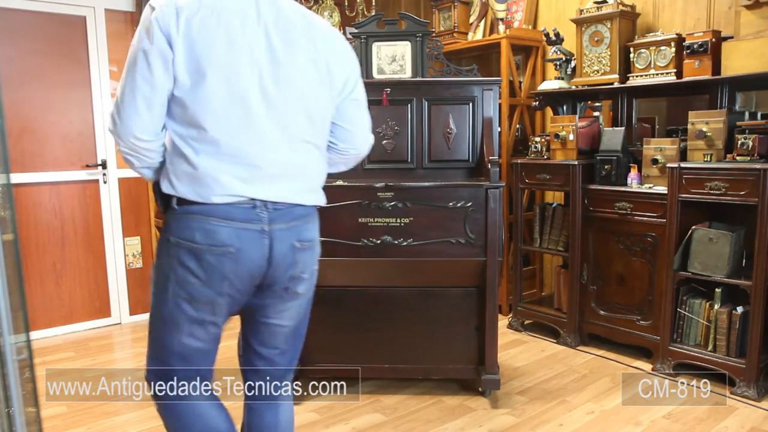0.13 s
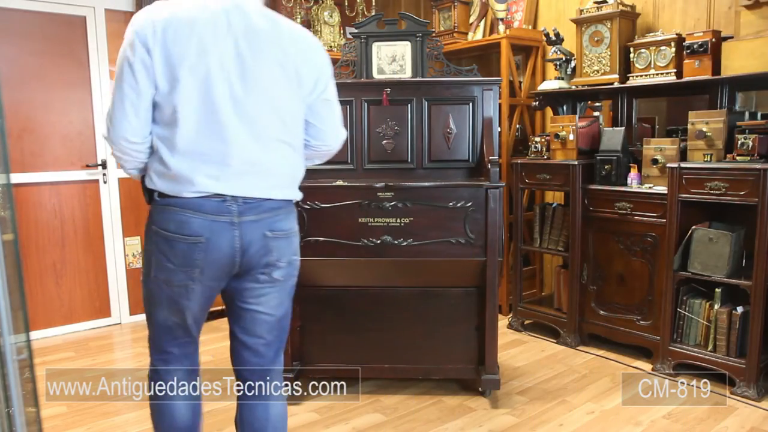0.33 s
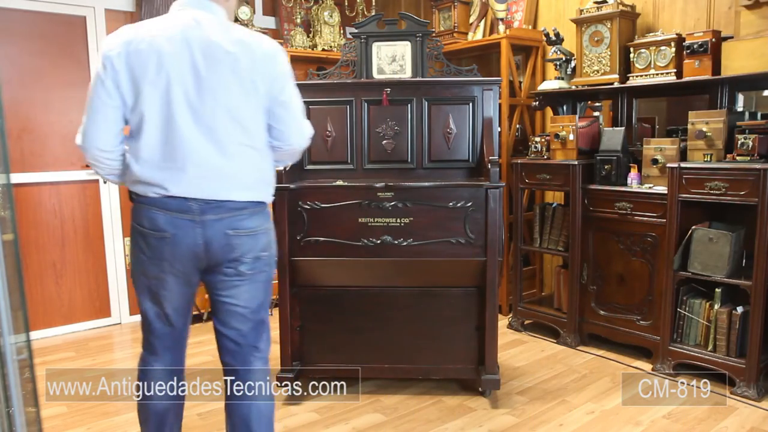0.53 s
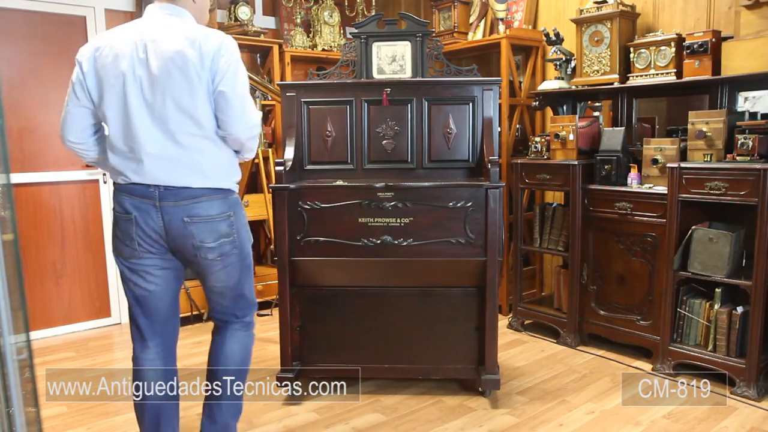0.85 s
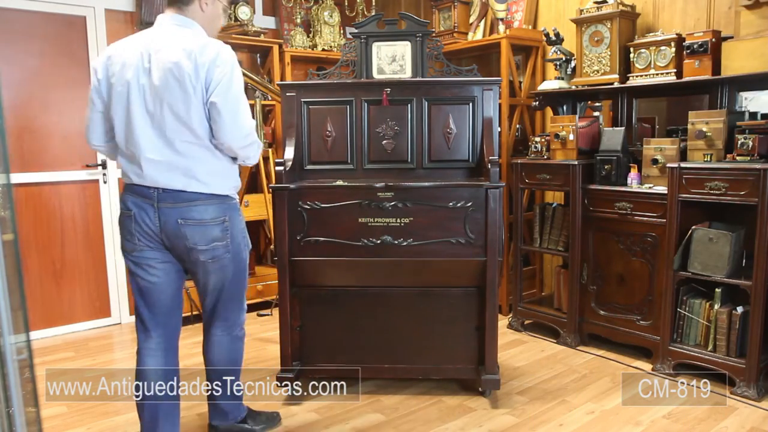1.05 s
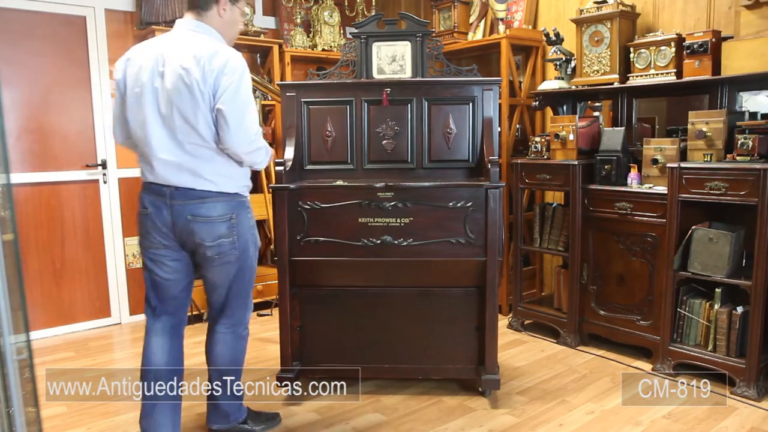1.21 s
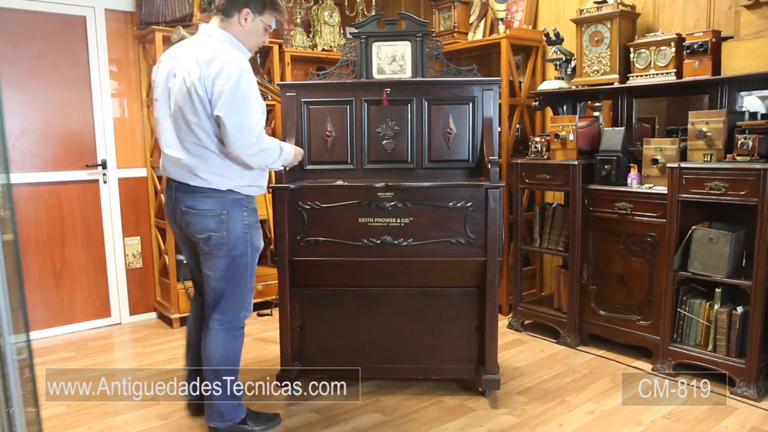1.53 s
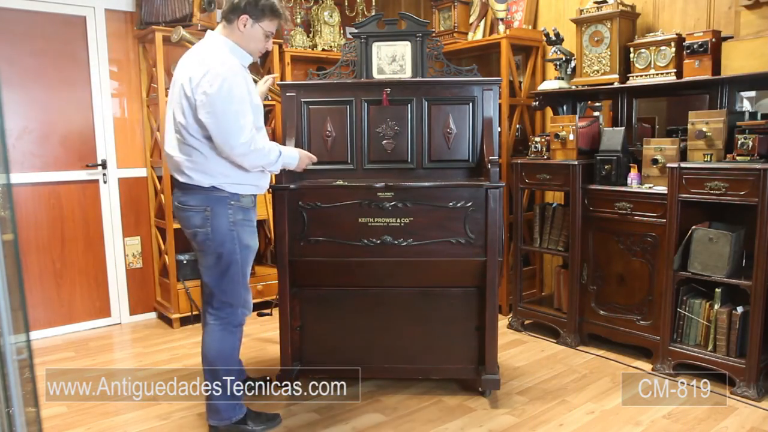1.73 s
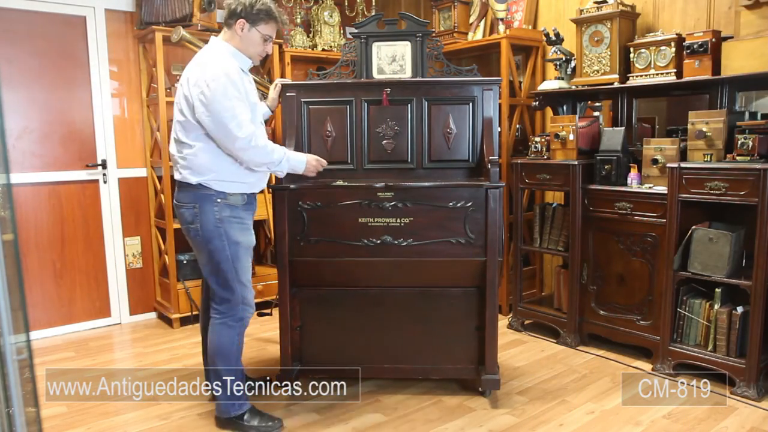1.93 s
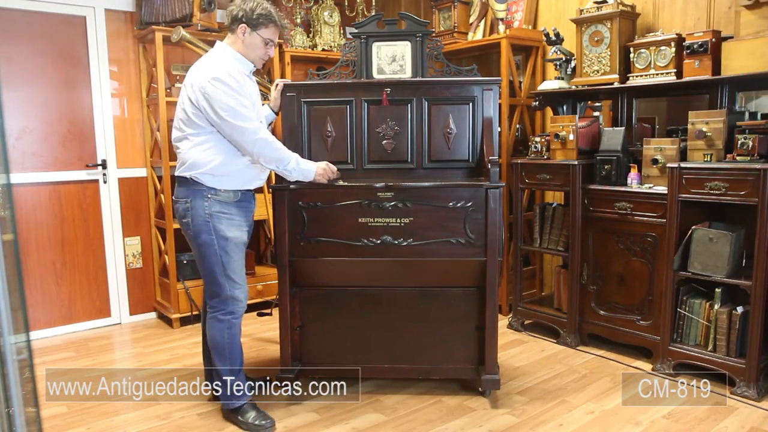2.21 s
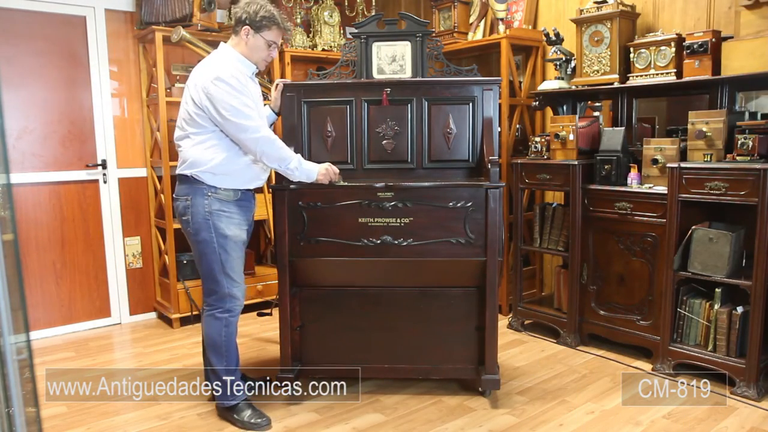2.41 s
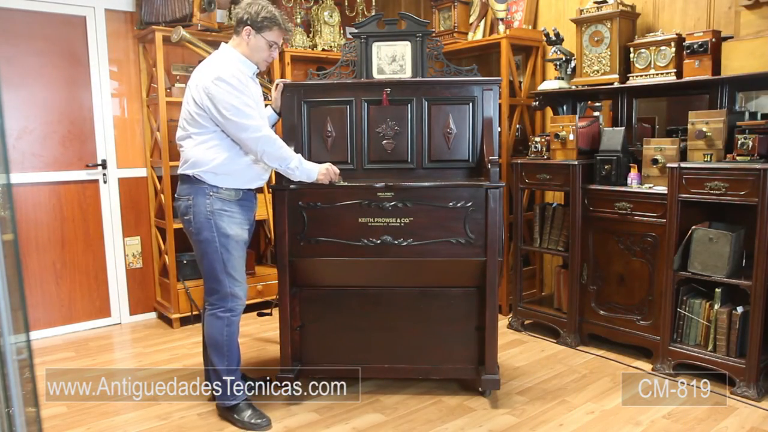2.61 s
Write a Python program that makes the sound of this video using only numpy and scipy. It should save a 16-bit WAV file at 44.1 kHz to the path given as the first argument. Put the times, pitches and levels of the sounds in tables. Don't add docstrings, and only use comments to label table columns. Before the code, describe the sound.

Footsteps in hard-soled shoes scuff and squeak across a wooden floor, then a hand knocks a rattling cabinet lid

```python
import sys
import numpy as np
from scipy import signal
from scipy.fft import rfft, irfft, next_fast_len
from scipy.io import wavfile
from scipy.ndimage import uniform_filter1d, map_coordinates

SR = 44100
rng = np.random.default_rng(int(sys.argv[2]) if len(sys.argv) > 2 else 0)


def magnitude_from_level(level_db):
    exponent = np.asarray(level_db, float) / 20
    return 10 ** exponent


def digitize_waveform(pressure):
    field = np.atleast_2d(pressure).T
    bounded = np.clip(field, -1, 1)
    quanta = np.round(bounded * 32767).astype(np.int16)
    wavfile.write(sys.argv[1], SR, quanta)


N = 121275


def unit(x):
    return x / np.sqrt(np.mean(x ** 2) + 1e-20)


def along(points, hz):
    f, v = np.transpose(points)
    return np.interp(np.log(hz + 1), np.log(f + 1), v)


def wobble(rate_hz):
    knots = rng.standard_normal(int(N * rate_hz / SR) + 4)
    return map_coordinates(knots, [np.arange(N) * rate_hz / SR])


def filtered(x, response):
    m = next_fast_len(N + 8192)
    return irfft(rfft(x, m) * response(np.fft.rfftfreq(m, 1 / SR)), m)[..., :N]


def noise(response):
    return unit(filtered(rng.standard_normal(N), response))


def evened(x, window):
    return unit(x / (abs(uniform_filter1d(x ** 2, size=window)) + .1) ** .35)


def peaks(table):
    def response(f):
        return sum((-1) ** k * magnitude_from_level(db) * 1j * f * w / (c * c - f * f + 1j * f * w)
                   for k, (c, w, db) in enumerate(table))
    return response


def add(track, start_s, sound):
    part = track[max(round(start_s * SR), 0):][:len(sound)]
    part += sound[:len(part)]


def ring(modes, attack_s, spread_db):
    t = np.arange(SR // 2) / SR
    out = np.zeros(len(t))
    for hz, db, t60 in modes:
        out += magnitude_from_level(db + spread_db * rng.normal() - 60 * t / t60) * np.sin(2 * np.pi * hz * t)
    return (1 - np.exp(-t / attack_s)) * out


def pings(table, rise_s):
    out, t = np.zeros(N), np.arange(SR // 4) / SR
    for start_s, peak_db, pitch_hz, t60_s in table:
        decay = magnitude_from_level(peak_db - 60 * t / t60_s) * (1 - np.exp(-t / rise_s))
        add(out, start_s, decay * np.sin(2 * np.pi * pitch_hz * t))
    return out


# start_s, peak_db, pitch_hz, t60_s, overtones_db
TAPS = [(0.063, -20, 505, 0.045, -3), (0.2242, -11.5, 614, 0.11, -7), (.252, -10, 640, 0.053, -27),
        (0.3344, -13.5, 478, 0.088, -1), (0.528, -19.5, 354, 0.099, 2), (.676, -22, 468, 0.066, -9),
        (.867, -9, 748, 0.023, -8.5), (.883, -13.5, 730, 0.05, -19), (1.073, -12.5, 816, 0.03, -1),
        (1.4602, -6, 440, 0.034, -7.5), (1.509, -37, 424, 0.056, -10.5), (1.592, -12, 451, 0.03, -16),
        (1.928, -14.5, 494, 0.055, -3), (2.024, -18.5, 718, 0.042, 2)]
# ratio_to_pitch, level_db
BOARD_OVERTONES = [(.4, -2), (.56, -3), (1.28, -6), (1.62, -8), (2.4, -20)]
# start_s, peak_db,
# pitch_hz, t60_s
THUMPS = [(.2246, -17.5, 338, 0.11), (.3352, 2.5, 491, 0.033), (.338, -5, 199, 0.051),
          (.3405, -7.5, 420, 0.026), (.351, -8.5, 526, .04), (.8672, -13, 430, 0.028),
          (1.5958, 6.5, 448, 0.019), (1.609, -7, 423, 0.037), (2.04, -28, 159, 0.52),
          (2.3065, -16, 240, 0.089), (2.311, -16.5, 869, 0.13), (2.349, -18.5, 472, 0.083),
          (2.4485, -20.5, 463, .07)]


def taps():
    out = pings(THUMPS, rise_s=.0023)
    for start_s, peak_db, pitch_hz, t60_s, over_db in TAPS:
        overtones = [(pitch_hz * ratio, db + over_db, t60_s) for ratio, db in BOARD_OVERTONES]
        board = ring([(pitch_hz, 0, t60_s)] + overtones, attack_s=.0016, spread_db=1)
        add(out, start_s, magnitude_from_level(peak_db - 3) * board)
    return out


# start_s, rise_s, hold_s, level_db,
# extra_air_db
SCUFFS = [(-.05, 0.047, 0.022, -33.5, 1), (0.033, 0.098, 0.048, -40, 3), (0.227, .002, .035, -36, -18),
          (0.207, 0.087, 0.049, -18, -4), (0.463, 0.055, 0.22, -40.5, 1),
          (0.334, 0.019, 0.057, -20.5, -6.5), (0.851, 0.044, 0.13, -25, 2.5),
          (1.022, 0.038, 0.057, -37, -28), (1.146, .06, 0.23, -45, -3), (1.465, 0.055, 0.06, -21, 0),
          (1.606, 0.023, 0.037, -19, -4.5), (1.77, 0.075, 0.098, -26.5, 2.5),
          (1.95, 0.04, 0.054, -30.5, -6), (2.088, 0.11, 0.083, -35.5, 7.5)]
# freq_hz, level_db_per_hz
SOLE_COLOUR = [(410, -22), (700, -8), (1430, -10), (1610, -8.5), (1850, -8.5), (3450, -0.5), (3830, -4.5),
               (9630, -20), (15600, -33)]


def scuffs():
    rise_db, fall_db_per_s, air_hz = 20, 180, 7000
    grit_per_s, grit_spread_db, grit_share = 5000, 1.5, 0.26
    t = np.arange(N) / SR
    grains = (rng.random(N) < grit_per_s / SR) * rng.standard_normal(N)
    grains = unit(grains * magnitude_from_level(grit_spread_db * rng.exponential(size=N)))
    grit = np.sqrt(grit_share) * grains + np.sqrt(1 - grit_share) * rng.standard_normal(N)
    rub = unit(filtered(grit, lambda hz: magnitude_from_level(along(SOLE_COLOUR, hz))))
    air = filtered(rub, lambda hz: 1 / (1 + (air_hz / (hz + 1)) ** 4))
    out = np.zeros(N)
    for start_s, rise_s, hold_s, level_db, air_db in SCUFFS:
        below_db = rise_db * np.clip(1 - (t - start_s) / rise_s, 0, None) ** 0.75
        fall_db = fall_db_per_s * np.clip(t - start_s - rise_s - hold_s, 0, None)
        slide = magnitude_from_level(level_db - below_db - fall_db) * (t > start_s)
        out += slide * (rub + (magnitude_from_level(air_db) - 1) * air)
    return out * magnitude_from_level(0.37 * wobble(40.5) + 0.79 * wobble(150))


# start_s, length_s, level_db, pitch_hz, width_hz
DRAGS = [(0, 0.0046, -26, 380, 714), (0.225, 0.12, -24.5, 326, 438), (0.424, 0.15, -36.5, 437, 546),
         (0.864, 0.17, -31.5, 460, 132), (0.888, 0.024, -34.5, 187, 100), (1.469, 0.14, -26, 421, 183),
         (1.604, 0.017, -23, 447, 338), (1.615, 0.025, -28, 1185, 253), (1.743, 0.18, -37.5, 215, 151),
         (1.901, 0.02, -27, 770, 720), (2.231, 0.073, -36, 458, 90)]


def drags():
    rise_s, fall_db_per_s, lumps_db = .008, 281, 1.5
    t, out = np.arange(N) / SR, np.zeros(N)
    for start_s, length_s, level_db, pitch_hz, width_hz in DRAGS:
        resonance = peaks([(pitch_hz, width_hz, 0)])
        hum = evened(noise(lambda f: resonance(f) ** 2), SR // 40)
        fall_db = fall_db_per_s * np.clip(t - start_s - length_s, 0, None)
        level = magnitude_from_level(level_db + lumps_db * wobble(46.14) - fall_db)
        out += level * np.clip((t - start_s) / rise_s, 0, 1) * hum
    return out


# start_s, peak_db, length_s, rise_s
TICKS = [
    (0.234, -34, 0.005, 0.00038),
    (0.3418, -3, 0.014, 0.0022),
    (0.6754, -17, 0.0054, 0.0002),
    (0.916, -28, .005, 0.0017),
    (0.959, -20, 0.0036, 0.001),
    (1.071, -17.5, 0.0063, 0.0031),
    (2.026, -36, 0.009, .003),
]
# freq_hz, level_db_per_hz
TICK_COLOUR = [(500, -7), (900, 4.5), (1900, -12), (3300, 13), (4700, -3), (5600, -0.5), (11000, -18),
               (12800, -42)]
# start_s, peak_db, pitch_hz, t60_s
SNAPS = [(.2242, -10, 2110, 0.0064), (.2244, -19, 3320, .02), (.3445, -15, 1880, 0.044),
         (.3452, -4.5, 4680, .025), (.343, -16, 8500, 0.026), (.346, -10.5, 5900, 0.022),
         (.6735, -9.5, 3830, 0.0057), (.6759, -13, 3860, 0.0059), (.6737, -25, 5470, 0.0078),
         (.8671, -18, 1250, 0.019), (.8675, -20.5, 3550, 0.017), (.9098, -16.5, 3390, .035),
         (.9168, -16, 3400, 0.0091), (1.513, -12.5, 3080, .03), (1.549, -10.5, 3300, .04),
         (1.5785, -13, 2070, 0.026), (.347, -23.5, 10900, 0.018)]


def ticks():
    t = np.arange(N) / SR
    crack = evened(noise(lambda hz: magnitude_from_level(along(TICK_COLOUR, hz))), SR // 400)
    level = np.zeros(N)
    for start_s, peak_db, length_s, rise_s in TICKS:
        fall_db = 20 * np.clip((t - start_s) / length_s, 0, 20) ** 2
        level += magnitude_from_level(peak_db - 4.5 - fall_db) * np.clip((t - start_s) / rise_s, 0, 1)
    return pings(SNAPS, rise_s=0.0003) + crack * level


# start_s, pitch_hz, level_db, smear_hz
SQUEAK = [
    (0.082, 3400, -45, 120),
    (0.18, 3250, -34, 70),
    (0.3, 3150, -44, 70),
    (0.382, 2970, -32, 45),
    (0.499, 2900, -38, 35),
    (0.6, 2826, -31.5, 35),
    (.618, 2825, -31, 35),
          (.625, 2560, -42, 30),
    (.66, 2480, -37, 24.8),
    (.72, 2550, -41, 25),
    (.8, 2624, -37.5, 30),
    (.845, 2580, -39, 35),
    (.86, 2480, -38, 60),
    (.89, 2440, -42, 70),
    (.91, 2340, -57, 40.3),
]


def squeak():
    waver_hz, flutter_db = 12, 2
    s, hz, db, smear_hz = np.transpose(SQUEAK)
    t = np.arange(N) / SR
    pitch_hz = np.interp(t, s, hz) + waver_hz * wobble(30.14) + np.interp(t, s, smear_hz) * wobble(300)
    level_db = np.interp(t, s, db, -90, -90) + flutter_db * wobble(57.6)
    return magnitude_from_level(level_db) * np.sin(2 * np.pi * np.cumsum(pitch_hz) / SR)


# start_s, peak_db
JUDDER = [
    (1.838, -18),
    (1.85, -13),
    (1.863, -16.5),
    (1.869, -13.5),
    (1.878, -13.5),
    (1.881, -11),
    (1.894, -24),
    (1.903, -20),
    (1.911, -21),
]
# freq_hz, level_db, t60_s
JOISTS = [(70, -15, 0.35), (90, -11, 0.28), (160, -7, 0.28), (216.3, -5, 0.24)]


def judder():
    push_s, half = 0.001, 400
    u = np.arange(-half, half) / SR / push_s
    push = .5 * np.exp(-(u - 2.2) ** 2 / 2) - np.exp(-u ** 2 / 2)
    out = np.zeros(N)
    for start_s, peak_db in JUDDER:
        add(out, start_s - half / SR, magnitude_from_level(peak_db) * push)
        add(out, start_s, magnitude_from_level(peak_db - 9) * ring(JOISTS, attack_s=0.0039, spread_db=1))
    return out


# start_s, peak_db, length_s, body_db, crack_db
KNOCKS = [
    (2.3042, -2.5, 0.011, 4.5, -28.5),
    (2.311, -14, 0.16, 2, -45),
    (2.341, -10.5, 0.01, -22, -17.5),
    (2.352, -5, 0.013, -8, -36),
    (2.369, -9, 0.0081, -18, -50),
    (2.4487, -13, 0.0083, -6.5, -50),
    (2.465, -22, 0.11, -13, -40),
    (2.505, -22, 0.021, -8, -50),
]
# freq_hz, width_hz, level_db
LID = [(240, 56, 5.5), (480, 65, 1), (760, 370, -2.5), (1160, 96, 9), (1490, 70, 8), (1800, 76, 3.5),
       (2251, 145, 8), (2680, 68, 4.5)]
# freq_hz, width_hz, level_db
FITTINGS = [(1920, 1300, -2.5), (3150, 950, 0.5), (3600, 930, -0.5), (4660, 450, -28)]
# freq_hz, width_hz, level_db
CRACK = [(4480, 1800, 0), (9060, 760, 3)]
# start_s, peak_db, pitch_hz, t60_s
CLINKS = [(2.3057, -4, 2251, 0.056), (2.3058, -15, 1160, 0.037), (2.4482, -15, 760, .015),
          (2.3105, -9, 3410, 0.017), (2.3225, -21, 3480, .025), (2.3285, -15, 3400, .02),
          (2.334, -16, 3610, .02), (2.342, -10, 3150, .035), (2.3502, -10, 3150, 0.029),
          (2.356, -14, 3540, .025), (2.364, -12.5, 3500, 0.036), (2.3705, -11, 3180, 0.027),
          (2.4484, -7.5, 3110, 0.025), (2.4525, -16, 3840, 0.017), (2.452, -13, 1860, 0.02),
          (2.4495, -18, 2540, 0.024), (2.4605, -15, 1140, 0.015), (2.4705, -21, 3380, 0.023),
          (2.5028, -20.5, 3260, 0.028), (2.507, -25, 3680, .03)]


def knocks():
    blow_db, rough_db, rise_s = 22, -5, 0.00049
    lid_top_hz, fittings_top_hz, crack_top_hz = 3570, 4230, 11000
    t = np.arange(N) / SR
    start_s, peak_db, length_s, body_db, crack_db = np.transpose(KNOCKS)[:, :, None]
    short = length_s < .05
    hits = magnitude_from_level(peak_db - 20 * np.clip((t - start_s) / length_s, 0, 20))
    hits = hits * np.clip((t - start_s) / rise_s, 0, 1)
    blows = magnitude_from_level(peak_db + blow_db) * (np.arange(N) == np.round(start_s * SR) + 20) * short
    shake = np.sign(rng.standard_normal((3, N)))

    def lid_response(hz):
        return peaks(LID)(hz) / (1 + 1j * (hz / lid_top_hz) ** 5)

    def fittings_response(hz):
        bands = sum(magnitude_from_level(db) * peaks([(c, w, 0)])(hz) ** 2 for c, w, db in FITTINGS)
        return bands / (1 + (hz / fittings_top_hz) ** 10)

    def crack_response(hz):
        return peaks(CRACK)(hz) / (1 + (hz / crack_top_hz) ** 8)

    drive = magnitude_from_level(body_db) * (magnitude_from_level(rough_db * short) * hits * shake[0] + blows)
    body = filtered(drive.sum(0), lid_response)
    fittings = filtered((hits * shake[1]).sum(0), fittings_response)
    crack = filtered((magnitude_from_level(crack_db) * hits).sum(0) * shake[2], crack_response)
    return pings(CLINKS, rise_s=0.0003) + 0.87 * body + 1.26 * fittings + 2.7 * crack


# freq_hz, t60_s
ROOM = [(100, 0.32), (500, 0.46), (1500, 0.7), (3500, 0.67), (6000, 0.28), (15000, 0.71)]


def room(x, wet_db):
    out, step = np.pad(x, (0, 2 * SR)), SR // 4
    for at in range(0, N, step):
        hz, t, z = signal.stft(rng.standard_normal(SR), SR, nperseg=256)
        decay = magnitude_from_level(-60 * t / along(ROOM, hz)[:, None])
        tail = signal.istft(z * decay, SR, nperseg=256)[1]
        echo = signal.fftconvolve(x[at:at + step], tail / np.linalg.norm(tail))
        add(out, at / SR + .006, magnitude_from_level(wet_db) * echo)
    return out[:N]


# freq_hz, level_db_per_hz
HUSH = [(26, -49), (45, -6), (237, -3.5), (768, -7), (912, -9.5), (1060, -8), (2200, -13.5), (2810, -19),
        (15600, -25)]


def hush():
    return magnitude_from_level(-38.5 + 0.68 * wobble(1)) * noise(lambda hz: magnitude_from_level(along(HUSH, hz)))


WET_DB = [-5, -3, -2, -1.5, -1, -8]


def scene():
    low_cut_hz, judder_cut_hz = 110, 45
    sources = [scuffs(), taps() + drags(), ticks(), squeak(), judder(), knocks()]
    *steps, heavy, lid = [room(x, wet_db) for x, wet_db in zip(sources, WET_DB)]
    light = filtered(sum(steps) + lid, lambda hz: (1j * hz / (1j * hz + low_cut_hz)) ** 2)
    heavy = filtered(heavy, lambda hz: hz ** 2 / (hz ** 2 + judder_cut_hz ** 2))
    mono = light + heavy + hush()
    return np.array([mono, mono])


def low_pass(x):
    return signal.sosfilt(signal.butter(12, 15710, fs=SR, output="sos"), x)


def record(dry):
    offset, top, hardness, top_hz = -.0152, 1.0, 8, 15720
    x = dry + offset
    x = x / (1 + np.abs(x / top) ** hardness) ** (1 / hardness)
    mix = filtered(x, lambda hz: hz < top_hz)
    return low_pass(mix)


dry = scene()
out = record(dry)
digitize_waveform(out)
```